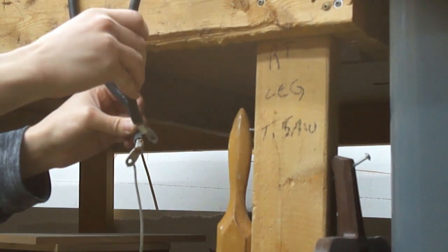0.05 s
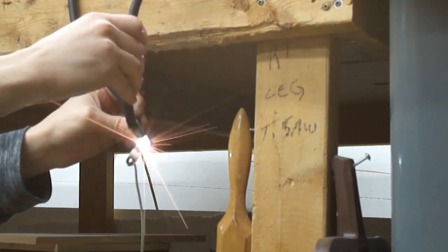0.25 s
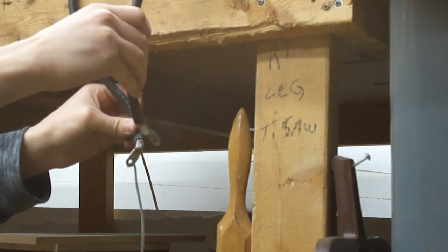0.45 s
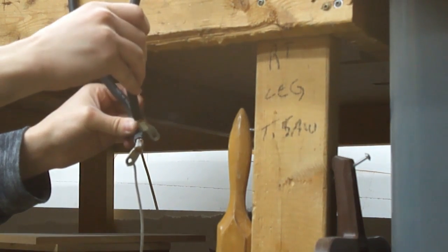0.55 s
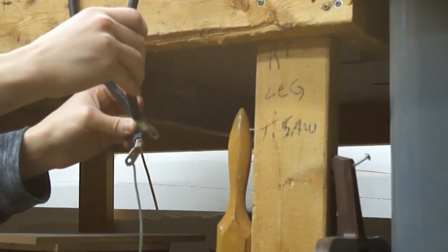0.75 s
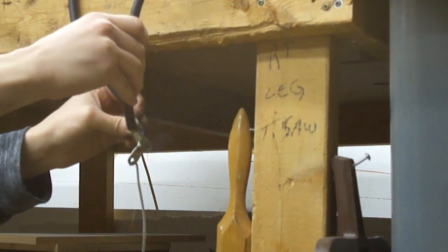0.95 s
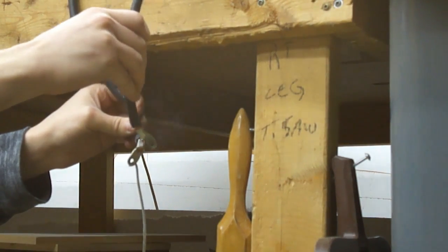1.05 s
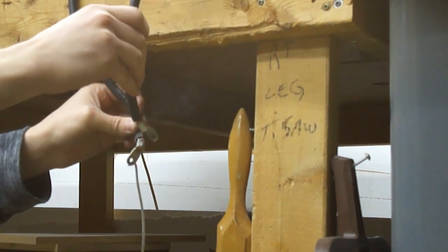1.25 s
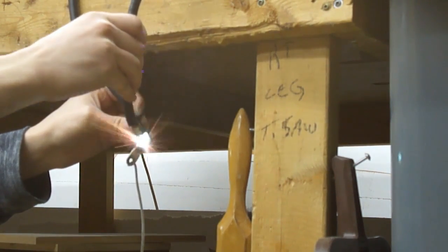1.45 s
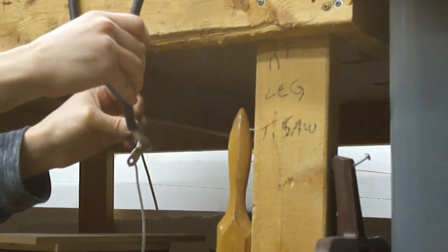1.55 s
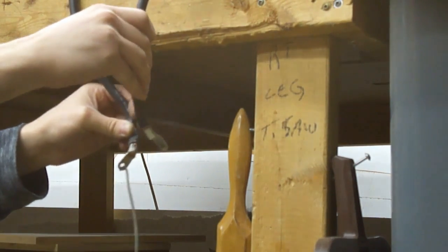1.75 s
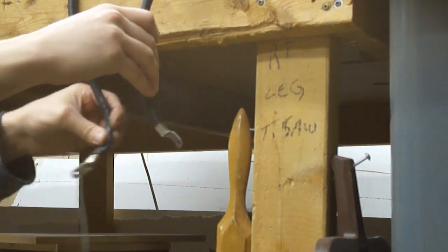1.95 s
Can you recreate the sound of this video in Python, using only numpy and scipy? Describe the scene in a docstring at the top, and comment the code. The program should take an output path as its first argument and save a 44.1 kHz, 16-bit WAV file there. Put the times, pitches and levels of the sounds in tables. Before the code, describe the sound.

Three short, sputtering electrical arcs crack sharply as battery cable ends touch, each ringing briefly in a workshop. Faint cable scuffs precede the later two, a metal lug scrapes at the end; close microphone, steady machine hum.

```python
"""In a workshop, over a machine's steady hum and whine, two ends of a thick battery cable touch three times.
Each touch strikes a sputtering arc: filtered impulses for the sharp snaps, dense random ones for the crackle,
and a puff of hot air. The cable scuffs around the second touch and before the third; its lug scrapes at the end.
The recorder's gain ducks under the cracks and recovers, so the room's ring swells before it fades."""
import sys
import numpy as np
from scipy import signal
from scipy.fft import rfft, irfft, next_fast_len
from scipy.io import wavfile
from scipy.ndimage import uniform_filter1d, minimum_filter1d, map_coordinates

SR = 44100
rng = np.random.default_rng(int(sys.argv[2]) if len(sys.argv) > 2 else 0)


def generate_wav(signal):
    """Clip the signal to [-1, 1] and save it as 16-bit WAV at the path in sys.argv[1]."""
    frames = np.transpose(np.atleast_2d(signal))
    scaled = np.clip(frames, -1, 1) * 32767
    pcm = np.round(scaled).astype(np.int16)
    wavfile.write(sys.argv[1], SR, pcm)


N = 88200


def amp(db):
    """Decibels to gain."""
    return 10 ** (np.asarray(db) / 20)


def unit(x):
    """Scale to rms 1."""
    return x / np.sqrt(np.mean(x ** 2) + 1e-20)


def along(points, hz):
    """Interpolate (f/Hz, value) points on a log frequency axis."""
    f, value = np.transpose(points)
    return np.interp(np.log(hz + 1), np.log(f + 1), value)


def filtered(x, response):
    """Multiply the spectrum of x by a response of frequency."""
    size = next_fast_len(len(x) + SR // 2)
    hz = np.fft.rfftfreq(size, 1 / SR)
    return irfft(rfft(x, size) * response(hz), size)[:len(x)]


def noise(spectrum):
    """Coloured noise of rms 1."""
    return unit(filtered(rng.standard_normal(N), lambda hz: amp(along(spectrum, hz))))


def resonance(f, centre, width):
    """Response of one resonant mode, 1 at its centre."""
    return 1j * f * width / (centre ** 2 - f ** 2 + 1j * f * width)


def pulse(spectrum, size=4096):
    """Minimum-phase pulse: the energy of this colour packed as early as it can be, peak 1."""
    cepstrum = irfft(np.log(amp(along(spectrum, np.fft.rfftfreq(size, 1 / SR)))))
    # fold the cepstrum onto positive time, which makes the pulse causal
    cepstrum[1:size // 2] *= 2
    cepstrum[size // 2 + 1:] = 0
    h = irfft(np.exp(rfft(cepstrum)))
    return h / abs(h).max()


def impulses(rows):
    """One impulse for each (t/s, level/dB) row."""
    s, db = np.transpose(rows)
    return np.bincount(np.round(s * SR).astype(int), amp(db), N)[:N]


def wobble(rate):
    """A smooth random curve through `rate` random knots a second."""
    knots = rng.standard_normal(int(N * rate / SR) + 4)
    return map_coordinates(knots, [np.arange(N) * rate / SR])


def sparks():
    """Each arc is a shower of tiny discharges on a hiss; the big snaps stand out of it."""
    # spells of arcing [start/s, length/s, level/dB]
    arcs = [(.2847, .0228, -6.5), (.931, .0162, -1), (.953, .007, -5), (.9635, .004, -4.5),
            (.9762, .0036, -1), (1.4921, .015, -6), (1.5272, .0125, -7), (1.5477, .003, -6),
            (1.5562, .0165, -6.5)]
    # the loudest snaps, before the recorder's gain control [t/s, impulse level/dB]
    snaps = [(.2872, 15), (.289, 13), (.2921, 8), (.2945, 7), (.2974, -1), (.3004, 9.5), (.3027, 8),
             (.3047, 15), (.9329, 20.5), (.9345, 21), (.9418, 18.5), (.9435, 19), (.9451, 21), (.9547, 19),
             (.9639, 12.5), (.9771, 19.5), (1.4952, 17.5), (1.5055, 18), (1.5309, 22.5), (1.5371, 8),
             (1.5479, 5.5), (1.557, 11.5), (1.5697, 17)]
    # colour of one spark [f/Hz, level/dB]
    spark_colour = [(40, -93), (200, -23.5), (500, -13.5), (1000, -6), (2000, -6.5), (3500, 0.5), (5500, 3),
                    (8000, -1), (10500, -6), (16000, -5.5)]
    snaps_per_s, size_spread_db = 3000, 1  # crackle inside an arc
    sizzle_db = -8  # hiss relative to the crackle
    rise_s = 0.00084  # time constant for an arc to catch

    t, spark = np.arange(N) / SR, pulse(spark_colour)
    sizes = amp(size_spread_db * np.clip(rng.standard_normal(N), -2, 2))
    crackle = unit((rng.random(N) < snaps_per_s / SR) * sizes)
    shower = crackle + amp(sizzle_db) * rng.standard_normal(N)
    drive = impulses(snaps)
    for start, length, db in arcs:
        on = (t >= start) & (t < start + length)
        catch = 1 - np.exp(-(t[on] - start) / rise_s)
        burst = unit(shower[on] - shower[on].mean())
        # dividing by the pulse's norm makes the level hold after the convolution
        drive[on] += amp(db) * catch * burst / np.linalg.norm(spark)
    return -signal.fftconvolve(drive, spark)[:N]


def puffs():
    """A push of hot air as the contact flashes: a deep thump and a hollow pop."""
    # puffs during the arcs [t/s, thump impulse level/dB, pop impulse level/dB]
    bursts = [(0.2877, -28, -20.5), (0.2969, -32, -21), (0.9326, -23.5, -21), (.9435, -18, 4.5),
              (1.4952, -24.5, -5.5)]
    # colour of the deep thump [f/Hz, level/dB]
    thump_colour = [(15, -13.5), (50, -1), (100, -9.5), (200, -14), (600, -25), (4000, -80)]
    # colour of the hollow pop [f/Hz, level/dB]
    pop_colour = [(30, -22), (150, 1.5), (350, 3), (600, 4.5), (1000, -12), (2500, -3.5), (8000, -43)]

    s, thump_db, pop_db = np.transpose(bursts)
    thump = signal.fftconvolve(impulses(np.c_[s, thump_db]), pulse(thump_colour))
    pop = signal.fftconvolve(impulses(np.c_[s, pop_db]), pulse(pop_colour))
    return (thump + pop)[:N]


def near_echoes(x):
    """Delayed copies off the hands and the bench close to the arc comb the sound of each snap."""
    # extra travel time of each echo [t/s]
    delays = [.0005, .00063, .00158, .00179, .00202]
    # level of each echo against the direct sound [level/dB]
    levels = [-22, -27, -9.5, -32, -20]

    def comb(f):
        return 1 + sum(amp(db) * np.exp(-2j * np.pi * f * s) for s, db in zip(delays, levels))

    return filtered(x, comb)


def room(x):
    """The workshop's ring: noise that builds quickly and decays at its own rate in each band."""
    # time for the ring to fall 60 dB, shortest in the top treble [f/Hz, T60/s]
    decay = [(150, 0.45), (600, 0.38), (1500, 0.34), (4000, 0.37), (7000, 0.31), (11000, 0.25)]
    # colour of the ring [f/Hz, level/dB]
    ring_colour = [(60, -24), (250, 0), (550, 2), (950, 5), (1300, 4), (2000, 5.5), (3500, -1),
                   (5000, -1.5), (7000, -2), (11000, 0)]
    ring_db, build_s = -7, 0.00084  # build-up is sampled at the 2.9 ms frames

    hz, t, bands = signal.stft(rng.standard_normal(SR * 3 // 4), SR, nperseg=256)
    fall = amp(-60 * t / along(decay, hz)[:, None])
    build = 1 - np.exp(-t / build_s)
    tail = signal.istft(bands * fall * build, SR, nperseg=256)[1]
    wet = signal.fftconvolve(x, tail / np.linalg.norm(tail))[:N]
    return filtered(wet, lambda f: amp(ring_db + along(ring_colour, f)))


def cable():
    """Dull noise as the cable shifts in the hands; noise through metal modes as its lug slides."""
    # scuffs of the cable [start/s, length/s, level/dB]
    scuffs = [(0.878, 0.026, -45.5), (.905, 0.074, -44), (1.456, 0.037, -49)]
    # colour of a scuff [f/Hz, level/dB]
    scuff_colour = [(40, -30), (200, -8), (380, -3), (800, -3), (1300, -11), (2500, -24), (8000, -37)]
    # level curve of the sliding lug [t/s, level/dB]
    slide = [(1.94, -62), (1.955, -51.5), (1.973, -46.5), (1.985, -56.5), (2.0, -47)]
    # modes of the lug [f/Hz, width/Hz, level/dB]
    lug_modes = [(3840, 71, 4.5), (7360, 100, -10), (8100, 100, -17), (8700, 100, -10)]
    # unpitched part of the scrape [f/Hz, level/dB]
    rub_colour = [(100, -45), (1000, -19), (3500, -10), (6000, -13), (11000, -24)]

    t = np.arange(N) / SR
    swell = np.zeros(N)
    for start, length, db in scuffs:
        progress = np.clip((t - start) / length, 0, 1)
        swell += amp(db) * np.sqrt(abs(np.sin(np.pi * progress)))

    def metal(f):
        ringing = sum(amp(db) * resonance(f, hz, width) for hz, width, db in lug_modes)
        return amp(along(rub_colour, f)) + ringing

    scrape = unit(filtered(rng.standard_normal(N), metal))
    slide_level = amp(np.interp(t, *np.transpose(slide))) * (t > slide[0][0])
    return swell * noise(scuff_colour) + slide_level * scrape


def background():
    """Room air as coloured noise, a machine's hum of wavering harmonics, a whine of narrow noise."""
    # colour of the room air [f/Hz, level/dB]
    air_colour = [(15, -73), (25, -32), (110, -16), (149, -15), (241, -10.5), (267, -12.5), (362, -6.5),
                  (433, -10), (468, -7), (1260, -10.5), (1400, -13), (1900, -12.5), (11000, -28),
                  (14300, -62), (22000, -120)]
    # hum lines before they waver [multiple of hum_hz, rms level/dB]
    hum_lines = [(1, -70), (2, -69.5), (3, -65), (6, -70.5), (10, -72.5), (12, -63), (13, -69), (14, -68.5),
                 (15, -107), (18, -72)]
    air_db = -55
    hum_hz = 120  # twice the mains frequency
    waver_db, wavers_per_s = 2.4, 8.08  # each line wavers on its own
    whine_hz, whine_width_hz, whine_db = 7850, 42, -72

    t = np.arange(N) / SR
    air = amp(air_db) * noise(air_colour)
    whine = unit(filtered(rng.standard_normal(N), lambda f: resonance(f, whine_hz, whine_width_hz)))
    hum = np.zeros(N)
    for multiple, db in hum_lines:
        level = amp(db + waver_db * wobble(wavers_per_s))
        hum += level * np.sin(2 * np.pi * (round(multiple) * hum_hz * t + rng.random()))
    return air + np.sqrt(2) * hum + amp(whine_db) * whine  # sqrt(2): sine peak for its rms


def scene():
    """Arcs, their echoes and ring, then the puffs, the cable handling and the background."""
    arc = sparks()
    return (near_echoes(arc) + room(arc) + puffs() + cable() + background())[None]


def gain_control(x):
    """The recorder's gain drops within milliseconds around a loud sound, holds, then creeps back."""
    ceiling_db, detect_s, hold_s, release_s = -20.5, 0.0063, 0.014, 0.036
    t, window, hold = np.arange(N) / SR, int(detect_s * SR), int(hold_s * SR)

    power = abs(uniform_filter1d(x ** 2, window))  # centred, so it sees slightly ahead
    over_db = np.maximum(10 * np.log10(power + 1e-12) - ceiling_db, 0)
    # largest overshoot of the past hold time
    held_db = -minimum_filter1d(-over_db, hold, origin=(hold - 1) // 2)
    # after the hold, the cut in dB dies exponentially
    fade = np.exp(-t / release_s)
    cut_db = np.maximum.accumulate(held_db / fade) * fade
    return x * amp(-uniform_filter1d(cut_db, window // 2))


def record(dry):
    """Gain control, then the recorder's notched treble and a sharp band limit."""
    # treble response of the recorder [f/Hz, level/dB]
    recorder_response = [(11000, 0), (11500, -26), (11900, -38), (12500, -38), (13100, -14), (14100, -22),
                         (15000, -45)]
    top_hz = 15418
    return filtered(gain_control(dry[0]), lambda hz: amp(along(recorder_response, hz)) * (hz < top_hz))[None]


dry = scene()
out = record(dry)
generate_wav(out)
```